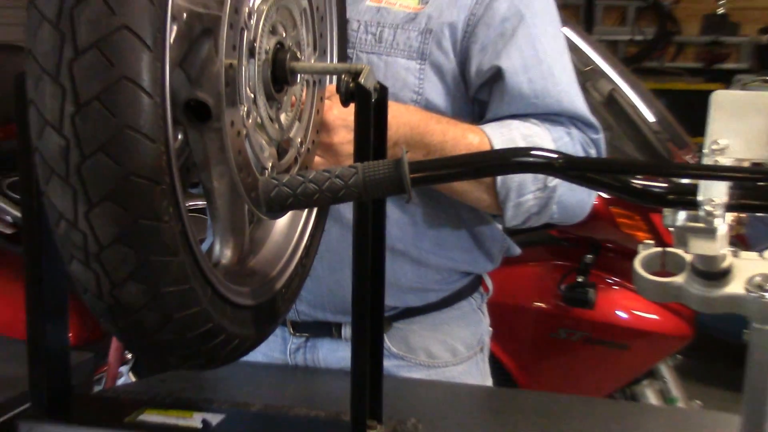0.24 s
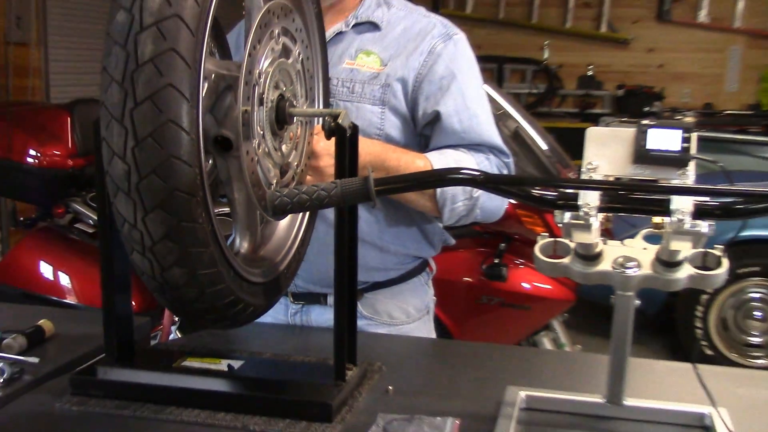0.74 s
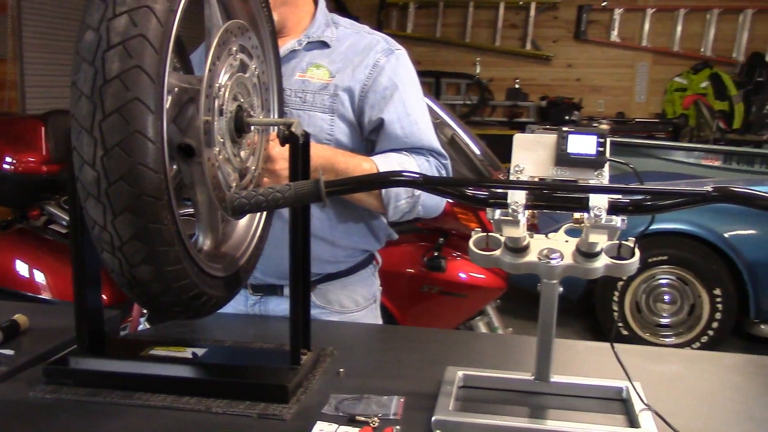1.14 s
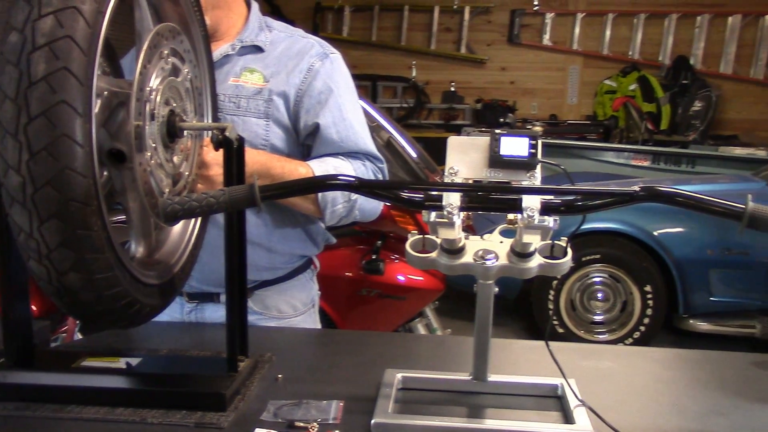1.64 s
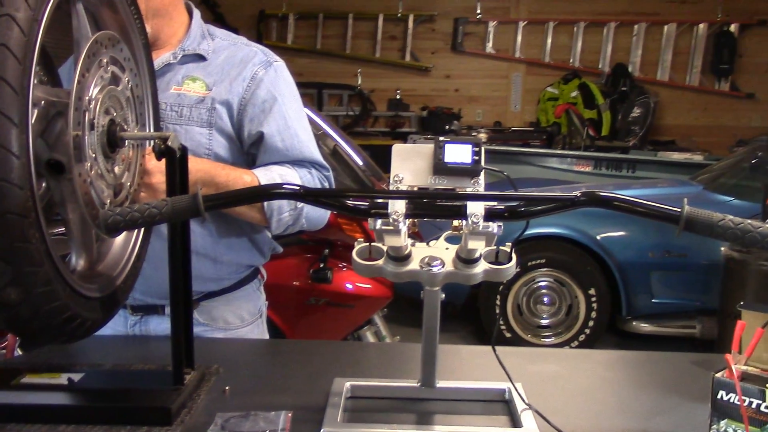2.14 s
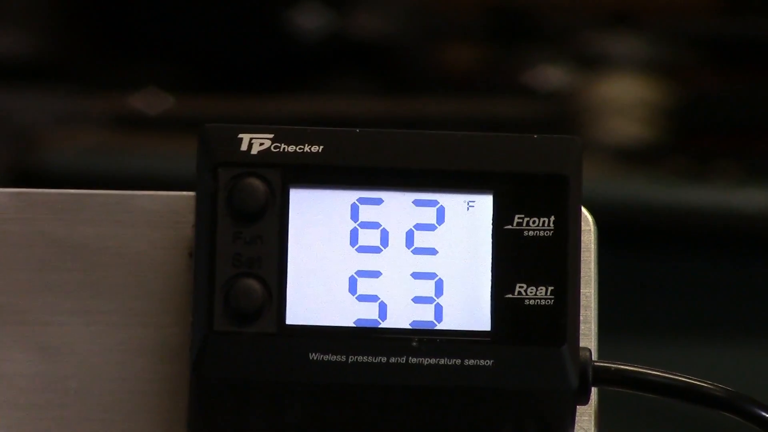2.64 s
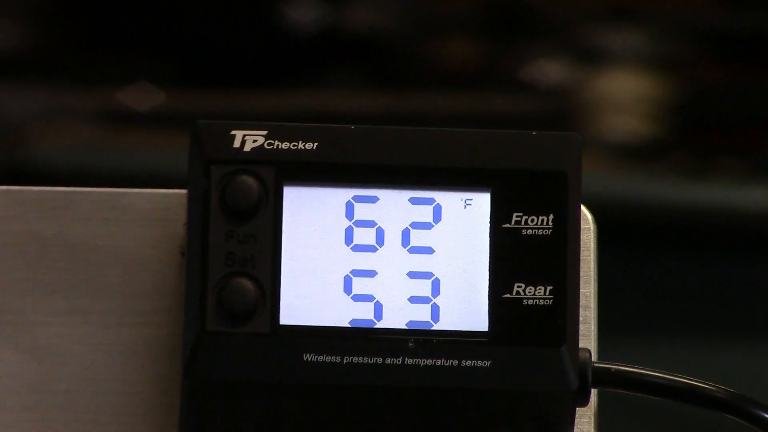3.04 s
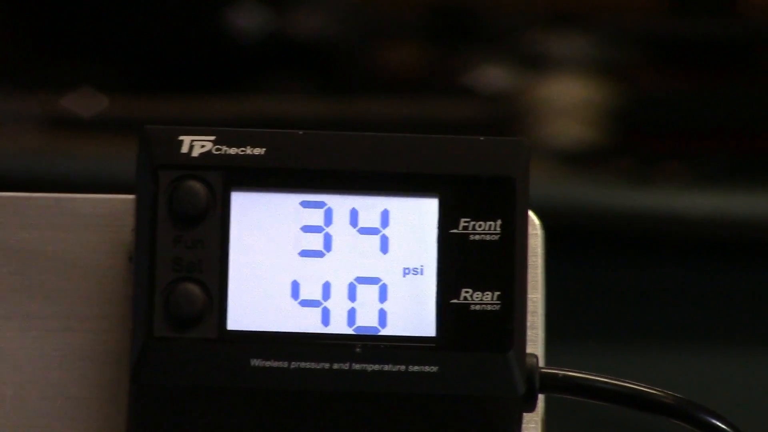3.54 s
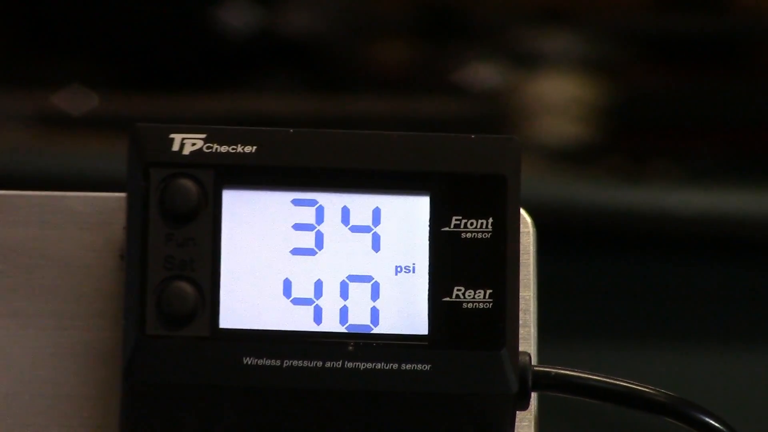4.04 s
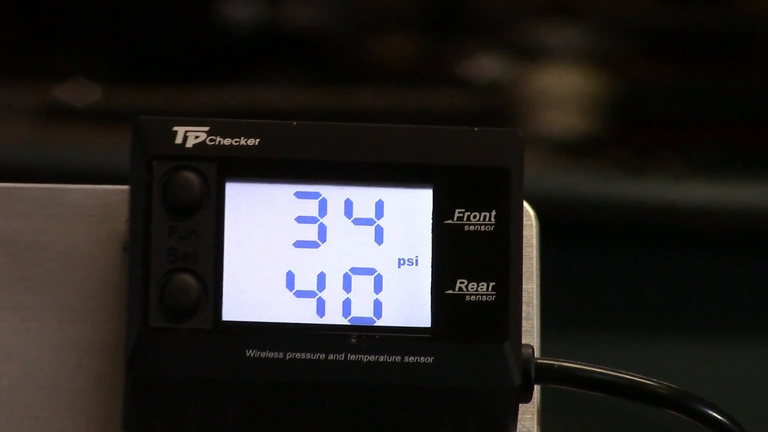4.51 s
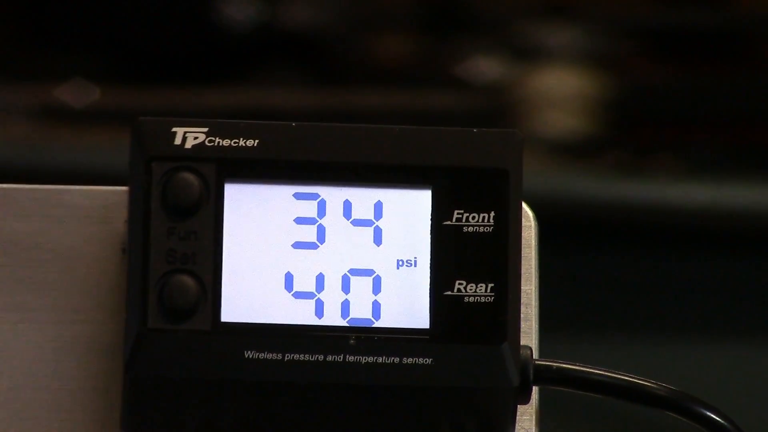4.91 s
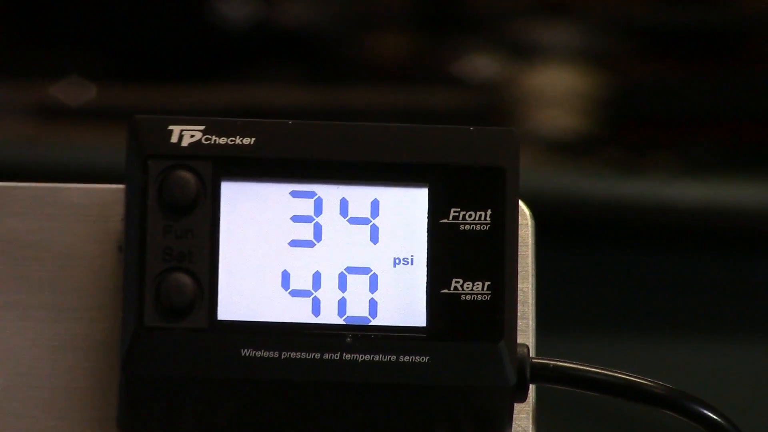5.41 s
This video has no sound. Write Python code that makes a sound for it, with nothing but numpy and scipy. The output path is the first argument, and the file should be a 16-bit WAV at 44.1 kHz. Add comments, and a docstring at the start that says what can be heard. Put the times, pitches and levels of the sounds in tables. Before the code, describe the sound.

A bright hiss of air escaping a tire valve in a garage, with a short pause and a few dull knocks.

```python
"""Air hisses from a tyre valve in a garage: a turbulent jet coloured by stem, rim and nearby surfaces.
A bright side leak drops as the valve tool seats; then the valve closes and the hiss dies away.
The sound drops out and fades in from a closer position, with a low rush from the tyre's cavity.
Under the first part lie the room's murmur, a faint hum and, throughout, a trace of electrical rumble.
A few dull knocks ring the wheel stand."""
import sys
import numpy as np
from scipy import signal
from scipy.fft import rfft, irfft, next_fast_len
from scipy.io import wavfile
from scipy.ndimage import uniform_filter1d

SR = 44100
rng = np.random.default_rng(int(sys.argv[2]) if len(sys.argv) > 2 else 0)


def to_wav(s):
    """Save 16-bit WAV."""
    ch = np.atleast_2d(s).T  # columns
    pcm = np.round(np.clip(ch, -1, 1) * 32767)  # PCM
    wavfile.write(sys.argv[1], SR, pcm.astype(np.int16))


N = 249899
TIME = np.arange(N) / SR
MOVE_S = 2.3655  # the listening position jumps closer


def undb(db):
    """Decibels to gain."""
    return 10 ** (np.asarray(db) / 20)


def ramp(start_s, length_s):
    """0 before the start, rising straight to 1."""
    return np.clip((TIME - start_s) / length_s, 0, 1)


def wander(rate_hz):
    """Smooth random modulation: held steps, slewed twice."""
    hold = int(SR / rate_hz)
    steps = np.repeat(rng.standard_normal(N // hold + 1), hold)
    return 0.82 * uniform_filter1d(uniform_filter1d(steps, hold), hold)[:N]


def turbulence(slow_db, quick_db):
    """White noise whose strength wavers with the eddies, slowly and quickly."""
    return rng.standard_normal(N) * undb(slow_db * wander(5) + quick_db * wander(250))


def colour(noise, curve, bells=()):
    """Shape noise with an EQ curve plus bell boosts and cuts; rms 1."""
    size = next_fast_len(N)
    f = np.maximum(np.arange(size // 2 + 1) * SR / size, 1)
    hz, db = np.transpose(curve)
    gain_db = np.interp(np.log(f), np.log(hz), db)
    for centre_hz, width_hz, bell_db in bells:
        gain_db += bell_db / (1 + (2 * (f - centre_hz) / width_hz) ** 2)
    shaped = irfft(rfft(noise, size) * undb(gain_db), size)[:N]
    return shaped / np.std(shaped)


def garage(direct, t60_s=0.27):
    """Add a dense tail of dull reflections, which combs a steady hiss finely."""
    t = np.arange(SR // 2) / SR
    tail = rng.standard_normal(len(t)) * 1000 ** (-t / t60_s) * (t > .003)
    tail *= undb(-9) / np.sqrt(np.sum(tail ** 2))
    tail = signal.sosfilt(signal.butter(1, 7000, fs=SR, output="sos"), tail)
    return direct + signal.fftconvolve(direct, tail)[:N]


# Broad EQ of the jet: f/Hz, level/dB
JET_EQ = [(200, -44), (700, -19), (1100, -20.5), (1500, -12), (3000, -10.5), (4300, -10), (6000, -8.5),
          (8000, -7), (9300, -11), (11000, -7.5), (11500, -16), (14500, -17), (15000, -25), (16000, -31)]
# Resonances and cancellations on the way to the listener: f/Hz, width/Hz, level/dB
JET_BELLS = [(1170, 98, 7), (1710, 320, 7), (1960, 110, 4), (2200, 125, -4.5), (2475, 190, 5.5),
             (2850, 100, 2.5), (3280, 130, 1.5), (3620, 120, -4), (3810, 140, 4.5), (4450, 190, -5.5),
             (4960, 420, 2), (5570, 200, 1.5), (6030, 160, -3), (6550, 280, 5), (7020, 730, 8),
             (7600, 300, 1.5), (8000, 200, 1), (8660, 250, -4), (9420, 120, -2), (9550, 150, 4),
             (10110, 430, 5.5), (10560, 500, 4.5), (12500, 300, 3.5), (13000, 200, -4), (13400, 400, 2)]

def valve_jet(shut, flow, level_db=-23.5, sag_db_per_s=0.44):
    """Turbulent air hisses out of the valve, losing some presence as it shuts."""
    hiss = colour(garage(turbulence(0.16, 0.69)), JET_EQ, JET_BELLS)
    presence = signal.sosfiltfilt(signal.butter(1, [2800, 5500], "bandpass", fs=SR, output="sos"), hiss)
    hiss -= 0.3 * np.sqrt(shut) * presence
    return undb(level_db - sag_db_per_s * TIME) * flow * hiss


# Bright EQ of the side leak: f/Hz, level/dB
LEAK_EQ = [(1500, -34), (2800, -4.5), (4000, -6.5), (5100, 2.5), (5900, -10), (7000, -4), (8000, 1),
           (9200, -1.5), (9800, -9), (12000, -16), (14000, -24)]

def side_leak(flow, seat_drop_db=7.5, sag_db_per_s=5):
    """Air spits past the valve tool until it seats, then dwindles; it closes off faster than the jet."""
    level_db = -25.5 - seat_drop_db * ramp(0.34, 0.07) - sag_db_per_s * TIME
    return undb(level_db) * flow ** 1.6 * colour(turbulence(1.5, 2.5), LEAK_EQ)


# Low-mid EQ of the room tone: f/Hz, level/dB
MURMUR_EQ = [(25, -46), (60, -29), (120, -14), (200, -7.5), (300, -0.5), (550, 1), (900, -9), (1300, -6),
             (2200, -11), (4000, -40)]

def room_murmur(hold_s=0.43, settle_s=0.37):
    """A low bed of room noise starts stronger and settles."""
    level_db = -50 + 6 * np.exp(-np.maximum(TIME - hold_s, 0) / settle_s)
    return undb(level_db) * colour(turbulence(0.63, 1.4), MURMUR_EQ)


def hum(centre_hz=224.9, width_hz=6.7):
    """A narrow band of noise makes a wavering hum that holds, then weakens."""
    edges = [centre_hz - width_hz / 2, centre_hz + width_hz / 2]
    tone = signal.sosfilt(signal.butter(2, edges, "bandpass", fs=SR, output="sos"), rng.standard_normal(N))
    level_db = -57.5 - 8.5 * ramp(start_s=1, length_s=0.2)
    return undb(level_db) * tone / np.std(tone)


# Bass-heavy EQ of the electrical floor: f/Hz, level/dB
RUMBLE_EQ = [(20, -16), (40, -9), (70, -1), (120, 1), (250, -17), (500, -40)]

def electrical_rumble(level_db=-78.5):
    """A steady, barely audible floor of low electrical noise."""
    return undb(level_db) * colour(rng.standard_normal(N), RUMBLE_EQ)


# Knock cues: t/s, peak level before the low cut/dB, ring time factor, tilt/(dB per octave)
KNOCK_CUES = [(.202, -26.5, 2.4, -2), (2.147, -26.5, .8, 3.5), (2.239, -37, 0.9, -1),
              (2.394, -41, 1.5, -17)]
# Modes of the wheel stand: f/Hz, level/dB, base t60/s
STAND_MODES = [(243, -3, 0.057), (349, -4, 0.071), (458, -1, 0.07), (591, -5, 0.043), (716, -3, .04),
               (870, -3, 0.029), (1080, 0.5, .025)]

def stand_knocks(contact_s=0.001):
    """Dull bumps on the wheel stand ring its modes; neighbouring modes swing in opposite sense."""
    track = np.zeros(N + SR)
    t = np.arange(SR // 2) / SR
    for start_s, peak_db, ring, tilt in KNOCK_CUES:
        knock = np.zeros(len(t))
        for k, (hz, mode_db, t60_s) in enumerate(STAND_MODES):
            gain = (-1) ** k * undb(mode_db + tilt * np.log2(hz / 345))
            knock += gain * np.sin(2 * np.pi * hz * t) * 1000 ** (-t / (t60_s * ring))
        knock *= 1 - np.exp(-t / contact_s)  # soft attack
        start = int(start_s * SR)
        track[start:start + len(t)] += undb(peak_db) * knock / np.max(np.abs(knock))
    return signal.sosfilt(signal.butter(2, 180, "highpass", fs=SR, output="sos"), track[:N])


# Broad EQ of the jet close up: f/Hz, level/dB
NEAR_JET_EQ = [(200, -58), (700, -25.5), (1100, -14.5), (1500, -10), (3000, -7.5), (4300, -7.5),
               (6000, -5.5), (8000, -5), (8700, -9), (9400, -9), (11400, -7.5), (11900, -14),
               (14000, -15.5), (16000, -19)]
# Resonances and cancellations on the closer path: f/Hz, width/Hz, level/dB
NEAR_JET_BELLS = [(1195, 110, 4.5), (1520, 68, 4.5), (1658, 110, 6), (1777, 214, 5), (2010, 200, 4),
                  (2220, 134, -5.5), (2460, 110, 4.5), (2640, 190, 4.5), (2840, 82, 3), (3060, 80, 0),
                  (3280, 80, 0), (3600, 150, 0), (3880, 120, 1), (4350, 230, -6.5), (4820, 360, 3),
                  (5200, 200, -4), (5500, 150, -0.5), (6650, 420, 3.5), (7340, 700, 4.5), (7850, 250, 1.5),
                  (9400, 300, -2), (10100, 670, 6.5), (10730, 710, 5.5), (12100, 200, 2), (12700, 600, 7),
                  (13400, 200, -3), (13900, 400, 0), (14600, 300, 0)]

def near_jet(full_db=-21.7, full_at_s=2.63):
    """The jet, close up, swells to full flow and then sags as the tyre empties."""
    swell_db = -2 * (1 - ramp(MOVE_S, full_at_s - MOVE_S))
    sag_db = -1.57 * ramp(full_at_s, 1.48)
    hiss = colour(garage(turbulence(0.14, 0.75)), NEAR_JET_EQ, NEAR_JET_BELLS)
    return undb(full_db + swell_db + sag_db) * hiss


# Dark EQ of the rush: f/Hz, level/dB
RUSH_EQ = [(25, -48), (60, -37), (120, -25), (200, -12), (280, -9.5), (330, -3.5), (450, -2), (650, -3),
           (900, -6), (1200, -17.5), (2500, -52)]
# Modes of the tyre's cavity: f/Hz, width/Hz, level/dB
CAVITY_MODES = [(310, 17, 5), (407, 55, 4), (470, 27, -1.5), (533, 42, 4.5), (586, 19, 6), (785, 37, 9),
                (990, 110, -3.5)]

def cavity_rush(sag_db_per_s=0.96):
    """Air leaving the tyre's cavity adds a hollow body that builds a moment late, then sags."""
    swell_db = -4.5 * (1 - ramp(start_s=2.543, length_s=0.071))
    level_db = -37 + swell_db - sag_db_per_s * (TIME - MOVE_S)
    return undb(level_db) * colour(turbulence(0.33, 1.9), RUSH_EQ, CAVITY_MODES)


def scene(seep_db=-24.5):
    """The valve closes to a seep; that position cuts out and the closer one fades in. Dual mono."""
    shut = ramp(start_s=2.01, length_s=0.36)
    flow = np.hypot(1 - shut, undb(seep_db))
    far = valve_jet(shut, flow) + side_leak(flow) + room_murmur() + hum()
    near = near_jet() + cavity_rush()
    cut_out = 1 - ramp(MOVE_S - 0.001, 0.0012)
    fade_in = ramp(MOVE_S, 0.15)
    mono = cut_out * far + fade_in * near + stand_knocks() + electrical_rumble()
    return np.array([mono, mono])


def record(dry, top_hz=15730):
    """A steep high cut takes off the very top of the hiss."""
    return signal.sosfilt(signal.ellip(16, .3, 90, top_hz, fs=SR, output="sos"), dry)


dry = scene()
out = record(dry)
to_wav(out)
```